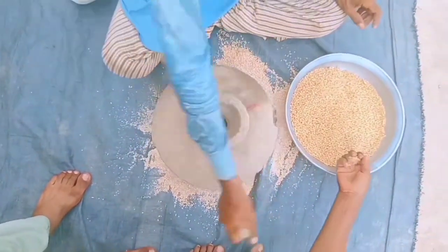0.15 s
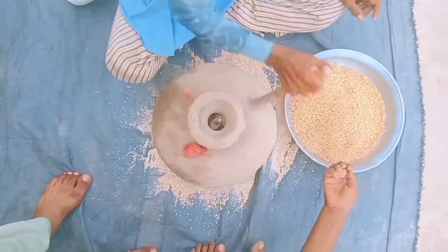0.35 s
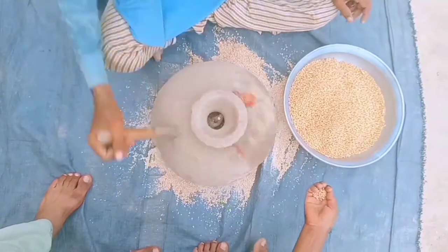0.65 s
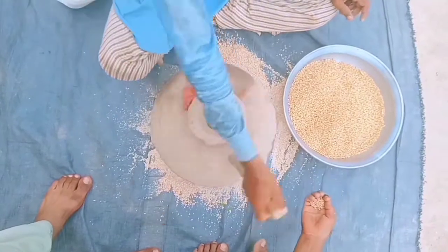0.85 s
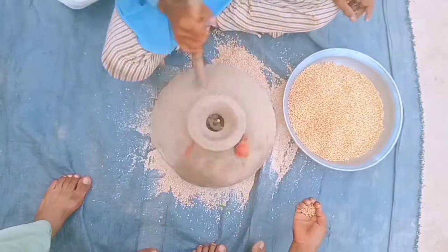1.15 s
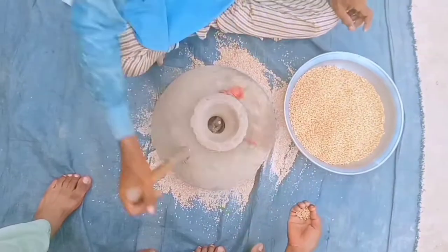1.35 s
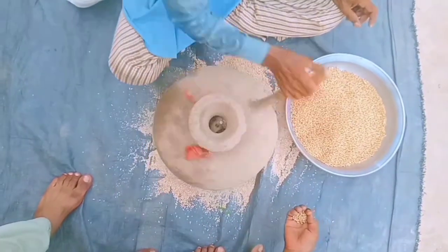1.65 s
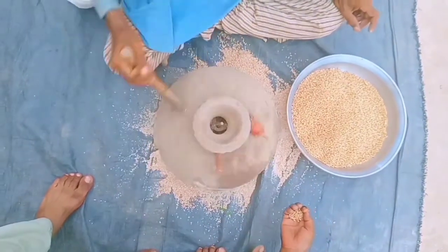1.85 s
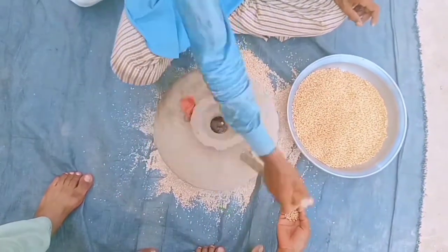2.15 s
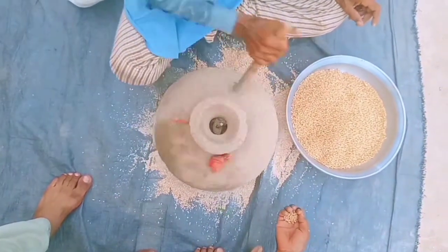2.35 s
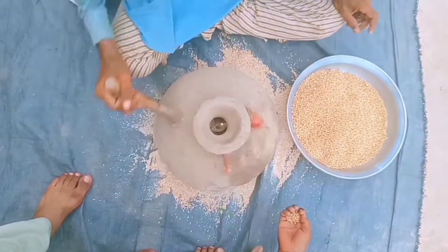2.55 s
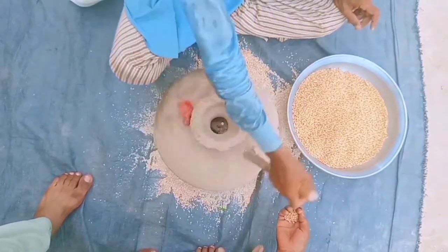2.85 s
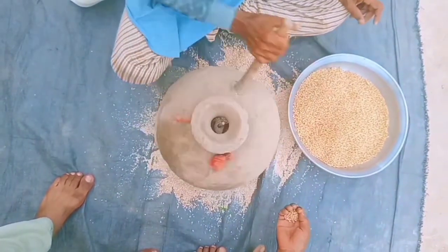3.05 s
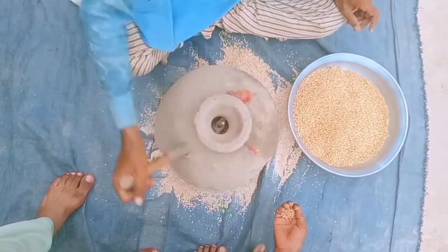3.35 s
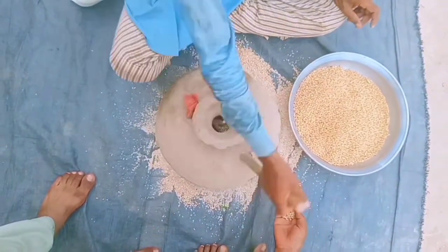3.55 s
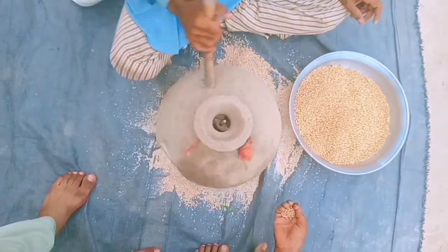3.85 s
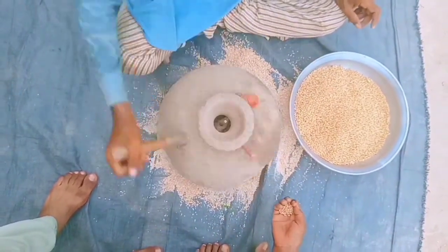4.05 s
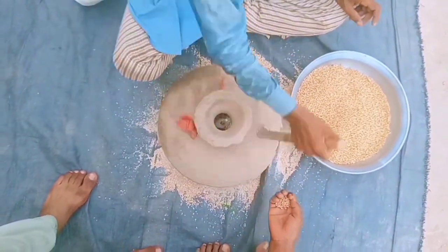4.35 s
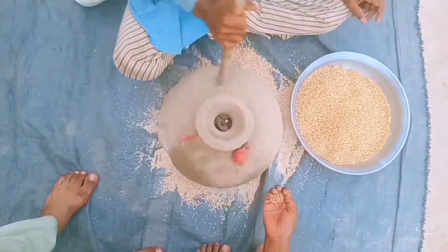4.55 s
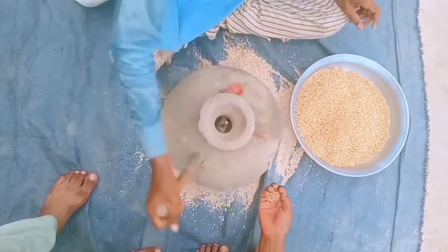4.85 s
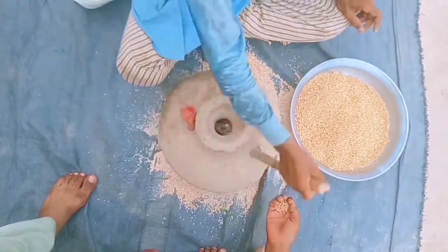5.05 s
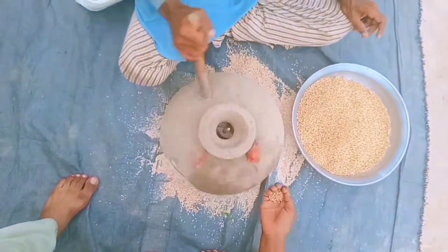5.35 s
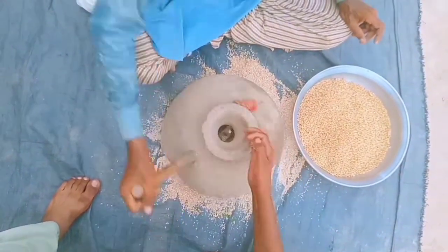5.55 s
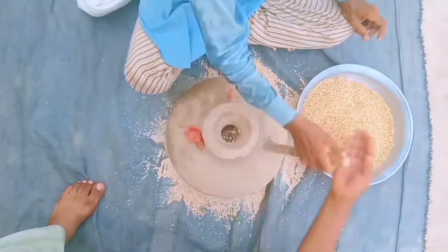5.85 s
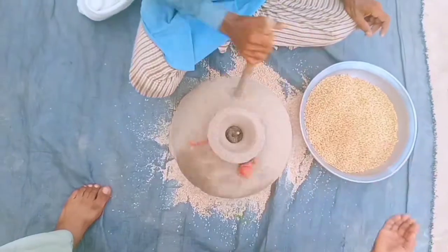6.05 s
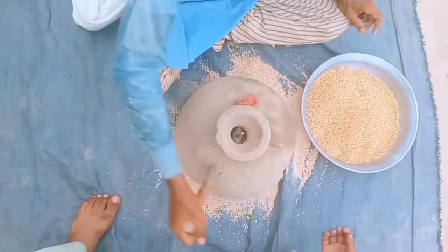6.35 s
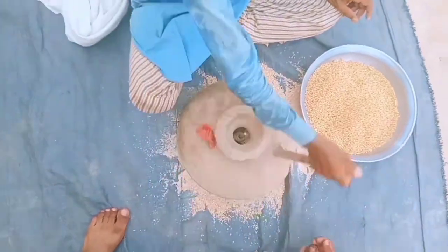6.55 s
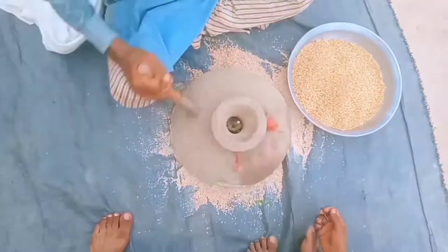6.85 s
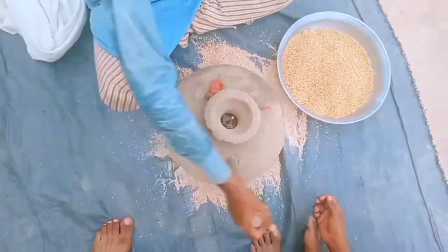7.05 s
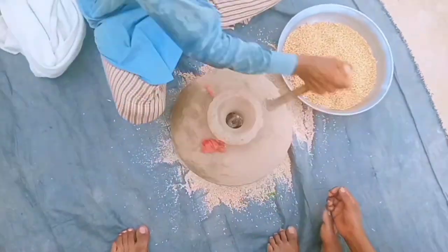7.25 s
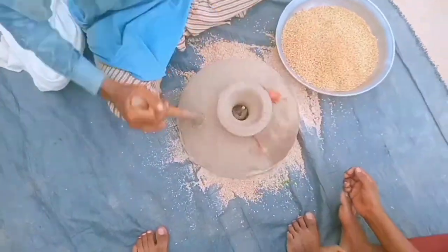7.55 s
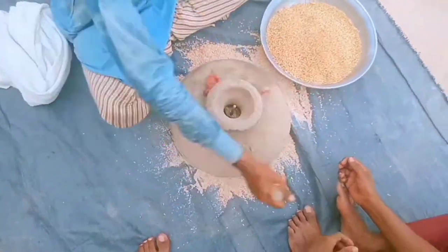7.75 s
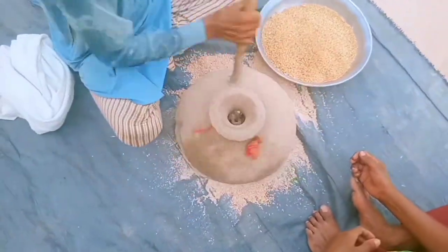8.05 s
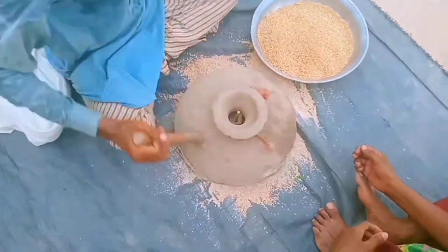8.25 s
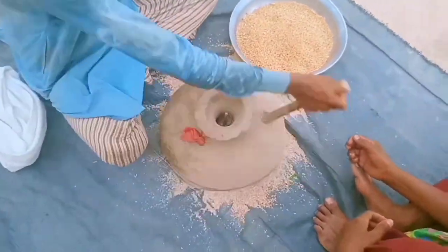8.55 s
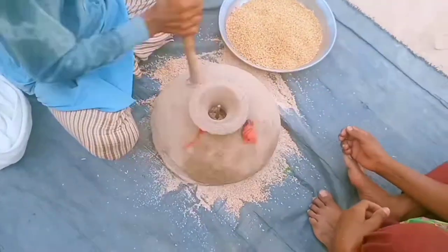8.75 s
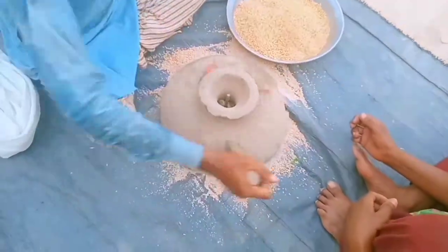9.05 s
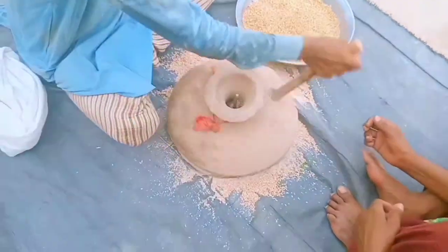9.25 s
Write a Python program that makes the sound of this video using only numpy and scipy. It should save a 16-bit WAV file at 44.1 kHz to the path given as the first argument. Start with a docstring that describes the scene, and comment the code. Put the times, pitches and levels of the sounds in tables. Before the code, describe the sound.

Stone turns on stone with grain between them: rough, throaty, mid-low grinding with a muffled gritty rasp and little treble, pulsing with every push of the hand. Brief scratchy stone squeaks and faint grain ticks appear. Knocks are sparse at first, then rattle in tight clusters through the middle, and once more late. Heard very close and outdoors without echo, the colour shifting as the microphone moves sideways.

```python
"""A stone hand mill turns on a cloth, about one and a half turns a second, with a push and a pull in each.
From the start, crushed wheat sends tiny cracks into the short, dull resonances of the stones, over a low
rumble; loose grains tick and bare stone sings out here and there. From about 1 s the upper stone knocks
down, soon followed by soft thuds; a faint chirp rises at 2.5 s, then knocks come in bursts, up to 6 s.
From 6.3 s the microphone moves to the side, changing the colour; one more burst comes near 7.7 s."""
import sys
import numpy as np
from scipy import signal
from scipy.io import wavfile
from scipy.ndimage import uniform_filter1d

SR = 44100
rng = np.random.default_rng(int(sys.argv[2]) if len(sys.argv) > 2 else 0)


def to_wav(s):
    """Save 16-bit WAV."""
    ch = np.atleast_2d(s).T  # columns
    pcm = np.round(np.clip(ch, -1, 1) * 32767)  # PCM
    wavfile.write(sys.argv[1], SR, pcm.astype(np.int16))


N = 414981  # samples, about 9.4 s

# How the hand turns the upper stone: (time [s], turns made so far [turns])
TURNS = [(0, 0.5), (2.25, 4.02), (4.25, 6.83), (6.25, 9.5), (7.25, 11.05), (9.41, 14.3)]
# The hand pushes and pulls once each per turn: (place in the turn [0-1], strength [0-1])
STROKES = [(.14, 0.92), (.72, 0.2)]
# Wheat between the stones, scaled by each layer's load share: (time [s], load [dB])
LOAD = [(0, 1), (.45, 1), (.8, 0), (1.1, 0.3), (2.45, 0.1), (2.85, -2.5), (3.6, -2.5), (4.1, -2.5),
        (4.42, -2.5), (4.7, -2.5), (5.15, -2), (5.8, -3.5), (6.25, -4.5), (6.4, -1.5), (6.6, -3.5),
        (7.0, -3), (7.2, -2.5), (8.2, -1)]
# Where the microphone is: (time [s], place [0 overhead to 1 at the side])
MIC_PLACE = [(6.3, 0), (7.5, 0.38), (8.2, 0.47), (8.7, 1)]
# Resonances of the pair of stones:
# (frequency [Hz], width of one filter pass [Hz], level overhead [dB], level at the side [dB])
STONE = [(382, 160, -19.5, -33.5), (530, 160, -34.5, -8.5), (620, 78, -2, 1), (665.3, 119, 2.5, -6.5),
         (752, 83, -7.5, -22), (924, 260, -38, -14.5), (1113, 195, -11, -10.5), (1342, 540, -14.5, -23),
         (1650, 163, -10, -3.5), (1970, 170, -24, -13.5), (2123, 96.5, -1.5, -9), (2277, 310, -11.5, -13.5),
         (2830, 1200, -31.5, -28.5), (2982, 113, -13.5, -22), (3524, 130, -23, -22),
         (3475, 1080, -28, -29.5), (4082, 170, -20.5, -18.5), (4350, 240, -25.5, -35),
         (6190, 460, -41, -40.5), (6700, 1100, -47.5, -51), (7200, 880, -43, -42.5)]
# Pitch of the stone body during grinding, before a small wander: (time [s], pitch [Hz])
BODY_PITCH = [(0, 666), (1.1, 672), (2.5, 650), (3.22, 668), (3.4, 638), (4.2, 656), (7.3, 653), (7.9, 644),
              (9.41, 666)]
# Base level of the stones' ring near 2 kHz, before trim and strokes: (time [s], level [dB])
RING_LEVEL = [(0, -32), (.7, -31), (1.3, -31.5), (2.65, -32.5), (2.85, -36.5), (3.5, -34), (4.05, -37),
              (4.25, -33.5), (4.6, -33), (5.5, -35), (7.0, -35.5), (7.3, -34.5), (7.9, -40.5), (8.3, -39),
              (8.65, -37.5), (9.41, -39)]
# The upper stone glides and the grinding dips briefly: (time [s], dip of the body [dB])
GLIDES = [(2.77, 4), (3.25, 6), (4.69, 1), (5.78, 1), (7.9, 3), (8.2, 6), (9.05, 4)]
# The upper stone drags on whole grains and its body groans: (time [s], rise [dB])
GROANS = [(4.79, 0.5), (4.9, 4.5), (4.98, 4), (5.24, 3), (7.77, 4.5)]
# Dry patches of meal change the rasp, mostly louder: (time [s], rise, or dip if negative [dB])
RASPS = [(.47, 0.5), (1.42, -1.5), (7.71, 5)]
# Bare stone rubs and one resonance sings: (time [s], frequency [Hz], level before trim [dB])
SINGS = [(.14, 3010, -35), (0.471, 4080, -39.5), (.53, 2180, -27), (.58, 3530, -38), (1.12, 3550, -38),
         (1.43, 4260, -31.5), (3.3, 2274, -47), (6.13, 3030, -38.5), (6.93, 2300, -38), (7.058, 3000, -41),
         (7.72, 4230, -42), (7.76, 3550, -37), (8.0, 2200, -33.5), (8.43, 3530, -37), (8.68, 2090, -32),
         (8.88, 3580, -36)]
# The upper stone drops or catches:
# (time [s], body peak [dB], clack peak before trim [dB], ring peak before trim [dB], body pitch [Hz])
KNOCKS = [(0.979, -16, -25, -21, 687), (1.235, -27, -34, -13.5, 686), (1.412, -20, -23, -16, 696),
          (1.681, -13, -21, -18, 670), (1.794, -32, -16.5, -14.5, 670), (1.83, -11, -31, -34, 677),
          (2.69, -5, -10.5, -15, 666), (2.72, -7.5, -26, -23, 660), (2.741, -5.5, -12, -11, 693),
          (2.762, -5.5, -21.5, -21, 654), (2.797, -8.5, -18, -23, 673), (3.713, -19, -25, -17.5, 643),
          (4.037, -24, -37, -33, 667), (4.725, -6.5, -12.5, -19, 640), (4.739, -6.5, -21, -17.5, 656),
          (4.749, -18, -36, -34, 660), (4.761, -4.5, -23, -18.5, 669), (4.772, -10, -16, -22, 640),
          (4.782, -11, -38, -19, 678), (4.795, -7, -36, -21.5, 643), (4.813, -8.5, -27, -28, 630),
          (4.834, -15.5, -42, -33, 678), (4.854, -9.5, -30, -25, 648), (4.861, -11.5, -29, -32, 660),
          (4.879, -16, -30, -35, 660), (4.886, -16, -32, -37, 652), (4.935, -11, -31, -21, 670),
          (4.964, -10, -27, -24.5, 658), (4.973, -7, -21.5, -17, 643), (4.978, -5.5, -13, -12, 630),
          (4.984, -7.5, -31, -30, 650), (4.993, -15, -35, -34, 650), (5.029, -8, -20, -25, 667),
          (5.045, -15, -30, -19, 657), (5.164, -13, -31, -16, 670), (5.2, -8, -15, -16, 673),
          (5.226, -3.5, -12, -11.5, 700), (5.268, -10.5, -15, -24, 647), (5.288, -5, -12, -13, 660),
          (5.399, -10, -22, -17, 658), (5.589, -13, -38, -24, 648), (5.603, -12, -17, -31, 567),
          (5.651, -15, -24, -18, 664), (5.682, -11.5, -18, -39, 640), (5.843, -8, -30, -39, 640),
          (5.928, -6.5, -16, -21, 650), (6.916, -27, -28, -26, 664), (7.02, -23, -30, -36, 683),
          (7.284, -21, -25, -28, 650), (7.39, -17, -21, -17.5, 660), (7.648, -11.5, -21, -38, 633),
          (7.668, -9.5, -11.5, -20, 633), (7.702, -13, -26, -27, 637), (7.711, -8.5, -23, -24, 662),
          (7.721, -8, -8.5, -21, 670), (7.727, -17, -16, -26, 650), (7.735, -9.5, -40, -23, 616),
          (7.752, -10, -35, -25, 630), (7.769, -15, -27, -24, 610), (7.816, -12.5, -31, -25, 600),
          (7.843, -8, -31, -25, 627), (8.603, -17, -36, -27, 630), (9.068, -23, -23.5, -21, 630)]
# Resonances where the stone edges meet, before damping: (frequency [Hz], width [Hz], level [dB])
CLACK = [(1093, 370, -4), (1364, 320, -0.5), (1627, 100, -2), (2660, 1100, -24.5)]
# Resonances of the rumble in the ground: (frequency [Hz], width of one filter pass [Hz], level [dB])
GROUND = [(91, 37, -5.5), (133.6, 94, 2), (151, 194, -5.5)]
# The upper stone lurches on its seat: (time [s], rise of the rumble [dB])
LURCHES = [(1.62, 4.5), (1.92, 3.5)]
# The lower stone rocks on the cloth: (time [s], peak [dB])
THUDS = [(1.549, -26), (1.622, -27), (1.922, -25)]
# Loose grains land and skitter: (time [s], level before trim [dB], decay time [s])
TICKS = [(0.115, -59, 0.007), (0.3346, -55, .005), (1.6062, -55, .004), (3.3129, -56, 0.0073),
         (7.705, -62, .035), (9.0638, -56, .008), (9.08, -62, .08)]
# A faint, high rising chirp, before its waver and roughness: (time [s], frequency [Hz], level [dB])
CHIRP = [(2.49, 4970, -66), (2.505, 5500, -60), (2.515, 6200, -54), (2.526, 6660, -52), (2.54, 6700, -72)]

# Upper edges of the resonance groups, in Hz; flour takes everything above the meal
BODY_TOP_HZ, MIDDLE_TOP_HZ, RING_TOP_HZ, MEAL_TOP_HZ = 1000, 1900, 3200, 5000
BODY_HZ = 655  # the body pitch at which the stone resonances are listed
STROKE_WIDTH_TURNS = 0.074
GLIDE_S, GROAN_S, RASP_S, SING_S, LURCH_S = 0.036, 0.05, 0.062, 0.022, 0.035  # bell widths
# Just before a hard drop the upper stone lifts and the grinding thins
LIFT_S, LIFT_DB, HARD_CLACK_DB = 0.0044, 3.5, -23
CUTOFF_HZ = 15500


def grinding(middle_glide_share=0.42, ring_stroke_db=1.5, ring_trim_db=0.06,
             kernel_db=16, pitch_wander=0.007):
    """Coarse cracks chiefly sound low resonances, fine meal the high ones; flour adds a steady hiss."""
    place, = in_time(MIC_PLACE)

    coarse = fractures(per_s=8000, spread_db=2.05, clump_db=1.3, clump_rate=78)
    whole_kernels = fractures(per_s=50, spread_db=1.43, clump_db=1.0, clump_rate=20)
    coarse = coarse + from_db(kernel_db) * whole_kernels
    fine = fractures(per_s=4200, spread_db=2.0, clump_db=3.5, clump_rate=84)
    flour_cracks = fractures(per_s=9000, spread_db=0.0, clump_db=2.0, clump_rate=70)

    glide_db = swells(GLIDES, GLIDE_S)
    hard_drops = [(s - LIFT_S, LIFT_DB) for s, _, clack_db, _, _ in KNOCKS if clack_db > HARD_CLACK_DB]
    lift_db = swells(hard_drops, LIFT_S)

    body_db = milling_db(level_db=-25.5, load_share=0.84, stroke_db=0.9, lag_turns=-0.012, side_db=-2.5)
    body_db = body_db - glide_db + swells(GROANS, GROAN_S)
    middle_db = milling_db(level_db=-33.5, load_share=0.93, stroke_db=2.5, lag_turns=0.005, side_db=-3.5)
    middle_db = middle_db - middle_glide_share * glide_db
    ring_db = in_time(RING_LEVEL)[0] + ring_trim_db + ring_stroke_db * effort(lag_turns=0.03)
    meal_db = milling_db(level_db=-43.5, load_share=0.91, stroke_db=2.0, lag_turns=0.028, side_db=-0.5)
    meal_db = meal_db + swells(RASPS, RASP_S)
    flour_db = milling_db(level_db=-59.0, load_share=1.0, stroke_db=1.0, lag_turns=0.02, side_db=-1.5)

    body_modes = stone_modes(0, BODY_TOP_HZ, place)
    middle_modes = stone_modes(BODY_TOP_HZ, MIDDLE_TOP_HZ, place)
    ring_modes = stone_modes(MIDDLE_TOP_HZ, RING_TOP_HZ, place)
    meal_modes = stone_modes(RING_TOP_HZ, MEAL_TOP_HZ, place)
    flour_modes = stone_modes(MEAL_TOP_HZ, SR, place)

    pitch = in_time(BODY_PITCH)[0] / BODY_HZ * (1 + pitch_wander * drift(5.3))
    body = from_db(body_db) * rubbed(coarse, body_modes, wander_db=1.54, wander_rate=13, pitch=pitch)
    middle = from_db(middle_db) * rubbed(coarse + 0.48 * fine, middle_modes, wander_db=2.0)
    ring = from_db(ring_db) * rubbed(coarse + 0.5 * fine, ring_modes, wander_db=1.5)
    meal = from_db(meal_db) * rubbed(fine + 0.5 * coarse, meal_modes, wander_db=2.1)
    flour = from_db(flour_db) * rubbed(flour_cracks + 0.5 * fine, flour_modes, wander_db=0.5)
    return from_db(-lift_db) * (body + middle + ring) + meal + flour


def knocks(crumble_db=-37, crumble_s=0.0016, clack_trim_db=-0.5, ring_trim_db=-1,
           contact_hz=2900, grip=1.31, grip_slope=0.26, thin_hz=500):
    """The upper stone drops on the lower: one blow, then a few milliseconds of crumbling grain."""
    out = np.zeros(N + SR)
    t = np.arange(SR // 20) / SR
    place, = in_time(MIC_PLACE)
    for s, body_db, clack_db, ring_db, pitch_hz in KNOCKS:
        at = round(s * SR)
        force = from_db(crumble_db) * rng.standard_normal(len(t)) * np.exp(-t / crumble_s)
        force[0] += 1  # the blow itself
        body_modes = stone_modes(0, BODY_TOP_HZ, place[at])
        low = [(hz * pitch_hz / BODY_HZ, width, db) for hz, width, db in body_modes]
        high = stone_modes(MIDDLE_TOP_HZ, MEAL_TOP_HZ, place[at])
        # stone on stone is bright and stops the body quickly; a dull blow lands on grain and hums on
        damping = grip * from_db(grip_slope * (clack_db - body_db))
        body = struck(cut(force, thin_hz, "high"), low, np.ones(len(low)), damping)
        cushioned = cut(force, contact_hz, "low")
        clack = struck(cushioned, CLACK, np.ones(len(CLACK)), damping=0.77)
        ring = struck(cushioned, high, rng.choice([-1, 1], len(high)), damping=0.86)
        knock = from_db(body_db) * body
        knock = knock + from_db(clack_db + clack_trim_db) * clack
        knock = knock + from_db(ring_db + ring_trim_db) * ring
        out[at:at + len(t)] += knock
    return out[:N]


def singing(width_hz=140, trim_db=-2):
    """Bare stone rubs on stone: noise through one resonance sings briefly, rough and fluttering."""
    out = np.zeros(N + SR)
    t = np.arange(SR // 4) / SR
    middle_s = t.mean()
    bell = np.exp(-0.5 * ((t - middle_s) / SING_S) ** 2)
    for s, hz, db in SINGS:
        at = max(round((s - middle_s) * SR), 0)
        tone = bell * resonate(rng.standard_normal(len(t)), hz, width_hz)
        # the level belongs to the top of the bell
        tone = rms_one(tone) * np.sqrt(np.mean(bell ** 2))
        out[at:at + len(t)] += from_db(db + trim_db) * tone
    return out[:N]


def rumble():
    """The heavy upper stone rolls over the grain: random bumps drive low resonances in the ground."""
    rolling_db = milling_db(level_db=-37.0, load_share=1.12, stroke_db=2.0, lag_turns=0.18, side_db=-1.5)
    rolling_db = rolling_db + swells(LURCHES, LURCH_S)
    bumps = fractures(per_s=2500, spread_db=0.5, clump_db=2.2, clump_rate=11)
    return from_db(rolling_db) * rubbed(bumps, GROUND)


def thuds(hz=270, width_hz=210, rock_s=0.01):
    """The lower stone rocks on the cloth: dying noise in a wide, low resonance makes a soft bump."""
    out = np.zeros(N + SR)
    t = np.arange(SR // 10) / SR
    for s, db in THUDS:
        at = round(s * SR)
        bump = resonate(rng.standard_normal(len(t)) * np.exp(-t / rock_s), hz, width_hz)
        out[at:at + len(t)] += from_db(db) * bump / np.abs(bump).max()
    return out[:N]


def loose_grains(tick_db=-9, dust_db=-76, load_share=1.7):
    """Landing grains tick as dying noise, over a very faint sift of flour that grows with the load."""
    out = np.zeros(N + SR)
    t = np.arange(SR // 4) / SR
    for s, level_db, decay_s in TICKS:
        at = round(s * SR)
        tick = rng.standard_normal(len(t)) * np.exp(-t / decay_s)
        out[at:at + len(t)] += from_db(level_db + tick_db) * tick
    load_db, = in_time(LOAD)
    sift = rms_one(from_db(2.5 * drift(15)) * rng.standard_normal(N))
    sift = from_db(dust_db + load_share * load_db) * sift
    return cut(out[:N] + sift, 4500, "high")


def chirp(waver=0.06, rough=0.73):
    """A thin whistle glides upwards; quick random changes of pitch and level roughen it."""
    hz, level_db = in_time(CHIRP)
    t = np.arange(N) / SR
    sounding = (t > CHIRP[0][0]) & (t < CHIRP[-1][0])
    whistle = np.sin(2 * np.pi * np.cumsum(hz * (1 + waver * drift(300))) / SR)
    return sounding * from_db(level_db) * (1 + rough * drift(250)) * whistle


def muffle(x, edge_hz=4600, leak_db=-7):
    """Little treble gets out from between the stones: a steep low-pass plus a weak band above it."""
    leak = cut(cut(x, 4600, "high", order=8), 7900, "low", order=4)
    return cut(x, edge_hz, "low", order=18) + from_db(leak_db) * leak


def effort(lag_turns):
    """Force of the hand, 0 to about 1: a push and a pull at the same places in every turn."""
    turns, = in_time(TURNS)
    place = np.linspace(0, 1, 100)
    one_turn = 0
    for at, strength in STROKES:
        distance = (place - lag_turns - at + 0.5) % 1 - 0.5  # the shorter way round the turn
        one_turn = one_turn + strength * np.exp(-0.5 * (distance / STROKE_WIDTH_TURNS) ** 2)
    return np.interp(turns - np.floor(turns), place, one_turn)


def milling_db(level_db, load_share, stroke_db, lag_turns, side_db):
    """Level of one layer: it rises with the load and each stroke, and depends on the microphone's place."""
    load_db, = in_time(LOAD)
    place, = in_time(MIC_PLACE)
    return level_db + load_share * load_db + stroke_db * effort(lag_turns) + side_db * place


def fractures(per_s, spread_db, clump_db, clump_rate, even_s=0.09):
    """Tiny cracks at random moments, many small and few large, in quick clumps evened by the stone's weight."""
    clumps = drift(clump_rate)
    clumps = clumps - uniform_filter1d(clumps, round(even_s * SR))
    sizes = rng.standard_exponential(N, dtype=np.float32)
    at = np.flatnonzero(rng.random(N, dtype=np.float32) < per_s / SR)
    out = np.zeros(N)
    out[at] = from_db(spread_db * np.minimum(sizes[at], 4) + clump_db * clumps[at])
    return out


def rubbed(cracks, modes, wander_db=1.5, wander_rate=8, pitch=None):
    """Cracks drive each resonance with random strength and sign; the balance wanders with the contact."""
    out = power = 0
    for hz, width, db in modes:
        gain = from_db(db + wander_db * drift(wander_rate))
        force = cracks * rng.standard_normal(N, dtype=np.float32)
        if pitch is None:
            tone = resonate(force, hz, width)
        else:
            tone = resonate_moving(force, hz * pitch, width)
        out = out + gain * tone
        power = power + gain ** 2 * width
    return rms_one(out / np.sqrt(power))  # a change of colour leaves the level alone


def struck(force, modes, signs, damping):
    """One force drives all resonances together; the contact's damping scales their widths; peak 1."""
    out = 0
    for sign, (hz, width, db) in zip(signs, modes):
        out = out + sign * from_db(db) * resonate(force, hz, width * damping)
    return out / np.abs(out).max()


def stone_modes(low_hz, high_hz, place):
    """The stone resonances within a range, with levels blended between overhead and side."""
    side = np.clip(place, 0, 1)
    return [(hz, width, top_db + side * (side_db - top_db))
            for hz, width, top_db, side_db in STONE if low_hz <= hz < high_hz]


def resonance_section(hz, width):
    """Filter numbers for one resonance: a narrower one rings longer."""
    r = np.exp(-np.pi * width / SR)
    g = (1 - r * r) / 2
    return [g, 0, -g, 1, -2 * r * np.cos(2 * np.pi * hz / SR), r * r]


def resonate(x, hz, width):
    """A resonance passed twice, stone to stone: it swells for a few cycles and dies quickly."""
    return signal.sosfilt([resonance_section(hz, width)] * 2, x + 1e-18)


def resonate_moving(x, hz, width, size=2048):
    """The same double resonance with a centre that follows a curve, block by block."""
    out, state = np.zeros(N), np.zeros((2, 2))
    for i in range(0, N, size):
        sections = [resonance_section(hz[i], width)] * 2
        out[i:i + size], state = signal.sosfilt(sections, x[i:i + size] + 1e-18, zi=state)
    return out


def swells(rows, width_s):
    """Brief bell-shaped changes of level, in dB."""
    t = np.arange(0, N, 100) / SR
    bells = sum(db * np.exp(-0.5 * ((t - s) / width_s) ** 2) for s, db in rows)
    return np.interp(np.arange(N) / SR, t, bells)


def drift(rate):
    """Slow random wandering with spread 1; a higher rate [Hz] wanders faster."""
    step = 40  # samples between the points of the curve
    r = np.exp(-2 * np.pi * rate * step / SR)
    noise = rng.standard_normal(N // step + 2002)
    slow = signal.lfilter([1], [1, -2 * r, r * r], noise)[2000:]  # drop the filter's start
    return np.interp(np.arange(N) / step, np.arange(len(slow)), rms_one(slow))


def in_time(rows):
    """One curve per column after the time, joined by straight lines."""
    s, *columns = np.transpose(rows)
    return [np.interp(np.arange(N) / SR, s, column) for column in columns]


def cut(x, hz, kind, order=2):
    """Keep what lies below ("low") or above ("high") a frequency, with a smooth Butterworth filter."""
    sections = signal.butter(order, min(hz, 0.45 * SR), kind, fs=SR, output="sos")
    return signal.sosfilt(sections, x + 1e-18)


def from_db(db):
    """Decibels to gain."""
    return np.exp(np.asarray(db) * (np.log(10) / 20))


def rms_one(x):
    """Scale to an average (rms) level of 1."""
    return x / np.sqrt(np.mean(x ** 2) + 1e-30)


def scene():
    """The mill, close to the microphone, in open air."""
    between_stones = muffle(grinding() + knocks() + singing())
    return (between_stones + rumble() + thuds() + loose_grains() + chirp())[None]


def record(dry):
    """The deepest bass is thinned and the top is cut steeply."""
    thin = cut(dry, 27, "high")
    return signal.sosfilt(signal.ellip(10, 0.1, 80, CUTOFF_HZ, fs=SR, output="sos"), thin)


dry = scene()
out = record(dry)
to_wav(out)
```